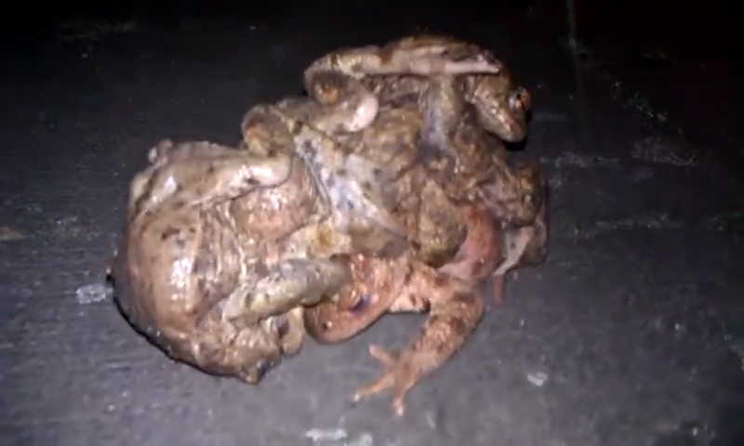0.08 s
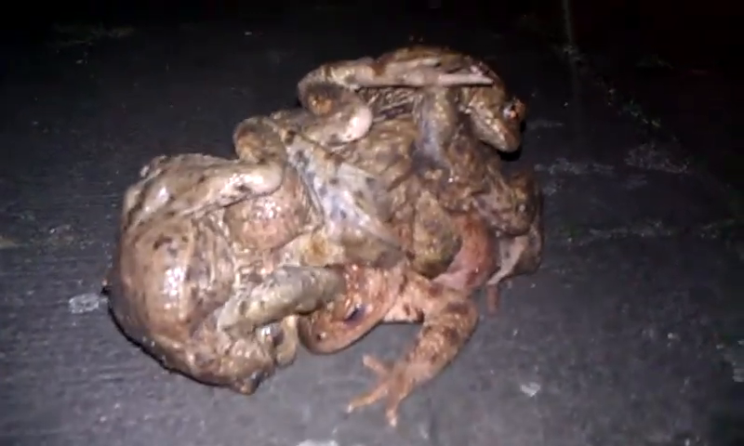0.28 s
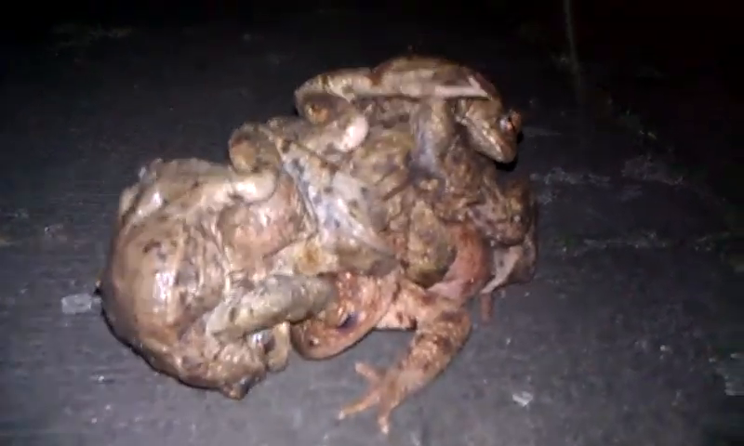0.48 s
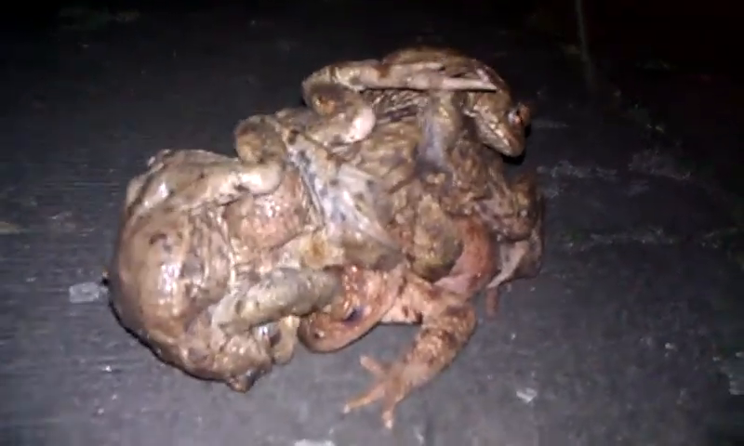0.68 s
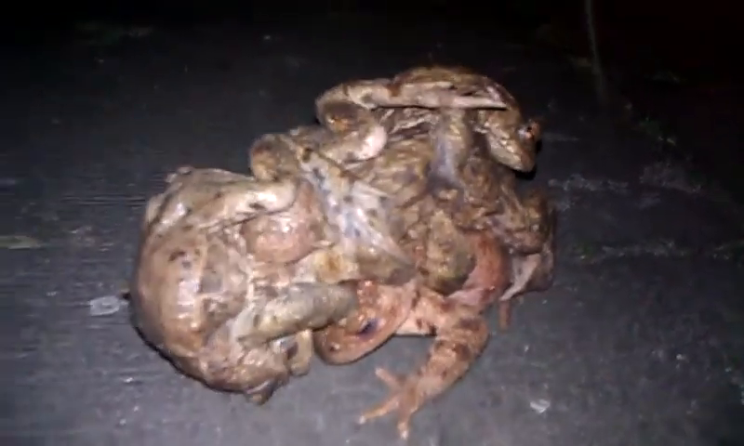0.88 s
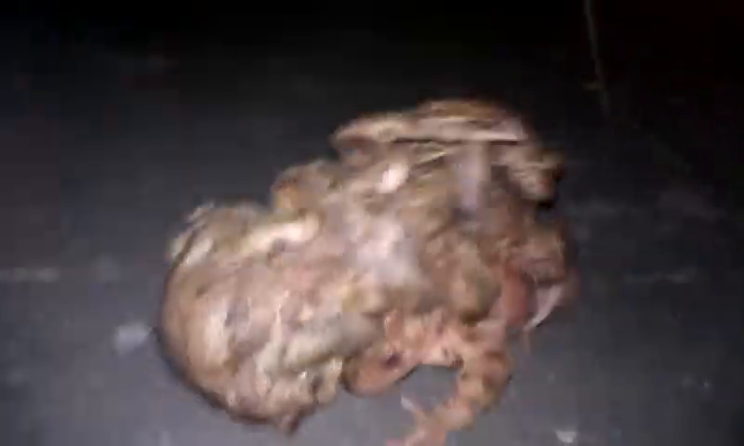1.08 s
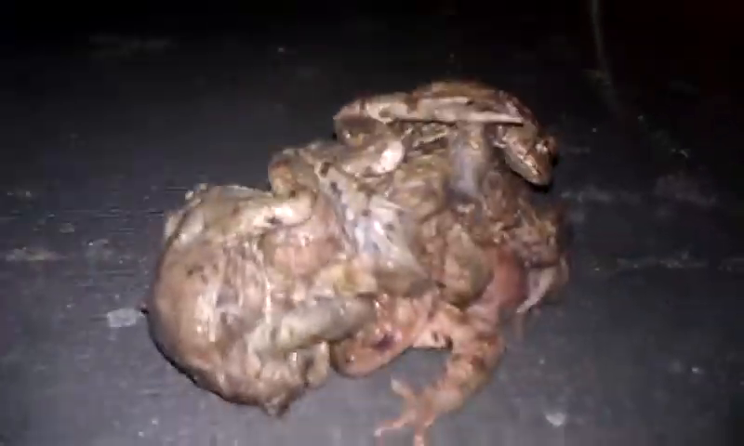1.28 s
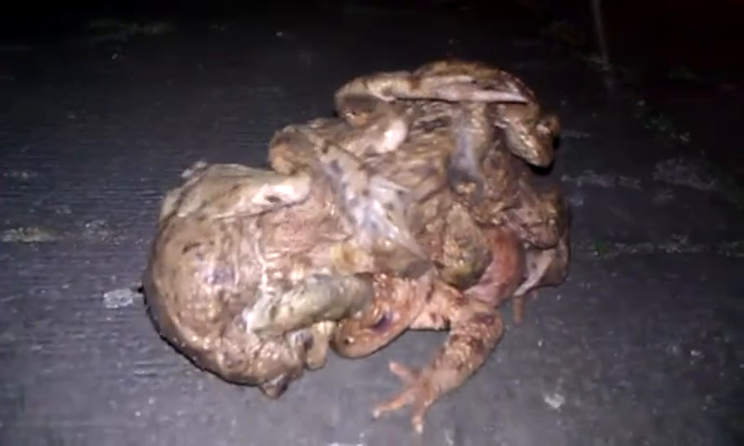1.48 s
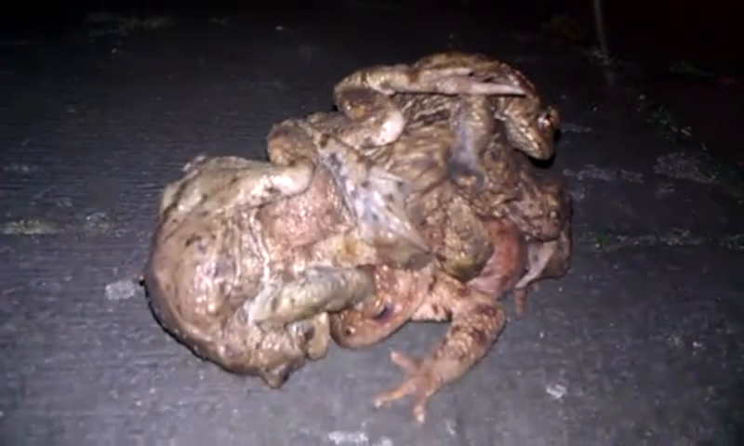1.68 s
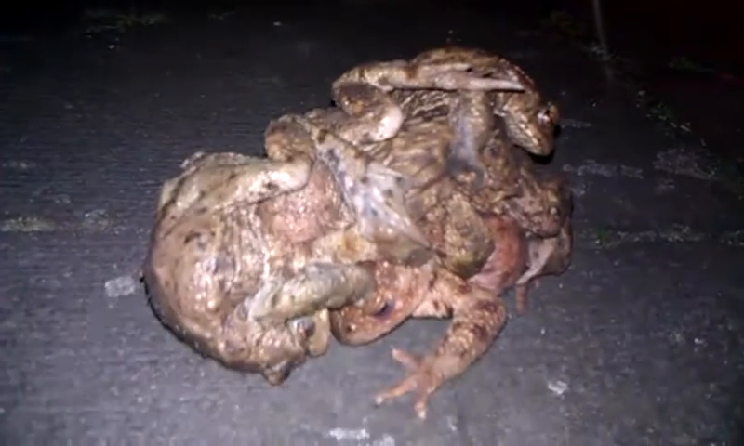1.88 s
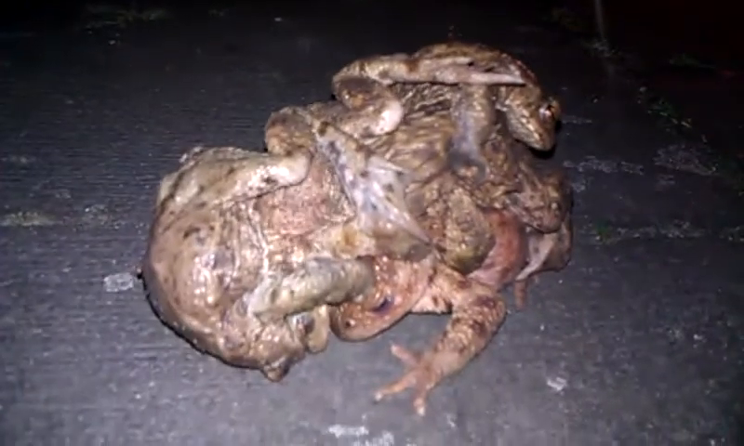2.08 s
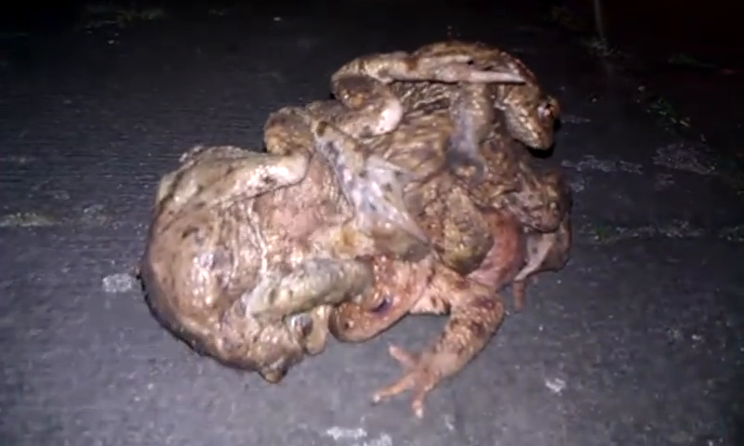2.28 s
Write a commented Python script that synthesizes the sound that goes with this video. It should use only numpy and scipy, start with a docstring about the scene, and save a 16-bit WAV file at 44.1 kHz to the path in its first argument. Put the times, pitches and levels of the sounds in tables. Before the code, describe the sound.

Toads chirp three times, close and dry, on a quiet night outdoors. First, at 0.2 s, clicks and a bright sharp rustle, probably a sleeve, trail off by 0.65 s. Soft scuffs lead to a short chirp at 0.92 s, with sharp clicks near 0.98. A longer stuttering chirp comes at 1.27, another at 1.99, each ending in a brief whistle-like note. Faint peeps, air and low hum lie behind.

```python
"""A sharp rustle, probably a sleeve, is heard first, with clicks at its onset; it trails off.
Then toads in a mating knot give three release chirps close to the microphone, on a quiet night.
Each chirp is a few short throat pulses that run together into a held, nearly pure note.
Small scuffs and clicks surround the first chirp; faint peeps, air and a low hum lie far behind.
Voices are summed overtones with breath noise; rustle, scuffs, clicks and air are coloured noise."""
import sys
import numpy as np
from scipy import signal
from scipy.fft import rfft, irfft
from scipy.io import wavfile
from scipy.ndimage import uniform_filter1d

SR = 44100
rng = np.random.default_rng(int(sys.argv[2]) if len(sys.argv) > 2 else 0)


def int16_out(signal):
    """Quantize to a 16-bit WAV file."""
    q = np.round(np.clip(np.atleast_2d(signal).T, -1, 1) * 32767)
    wavfile.write(sys.argv[1], SR, q.astype(np.int16))


N = 101430

# Every colour below shapes noise by frequency. Each row: frequency in Hz, relative level in dB.
# The night air, and the slow level of the far hum. Each hum row: time in seconds, level in dB.
NIGHT_COLOUR = [(20, -23), (40, -13), (60, -8), (90, -9), (135, -7), (170, -12.5), (300, -14.5),
                (520, -15.5), (870, -15), (1200, -18), (3000, -27.5), (5500, -25.5), (9000, -30),
                (15500, -33.5)]
HUM_LEVEL = [(0, -68), (.7, -68), (.85, -66.5), (1.4, -63), (1.5, -57.5), (1.65, -59.5), (1.85, -65),
             (1.92, -69), (2.3, -74)]
NIGHT_DB, HUM_HZ = -57, 55

# Faint far peeps. Each row: middle in seconds, half length in seconds, level in dB, mean pitch in Hz.
PEEPS = [(0.787, 0.19, -63.5, 1500), (1.862, 0.0036, -51.5, 1310)]

# Soft scuffs. Each row: peak time in seconds, level in dB, rise in seconds, fall in seconds.
SCUFFS = [(0.722, -54, 0.0032, .004), (0.809, -45.5, 0.0058, 0.017), (0.897, -38.5, 0.011, 0.011),
          (.915, -46, 0.0068, 0.027), (.975, -38.5, 0.0091, .014)]
SCUFF_COLOUR = [(400, -12), (2000, -16), (3300, -4), (4800, -1.5), (6500, 2), (8500, -9), (10500, -12),
                (12000, -36), (15500, -25)]

# Dry clicks. Each row: start in seconds, level in dB, decay in seconds, then the crack and the thud,
# both in dB against the click.
CLICKS = [(0.2135, -36.5, 0.0012, -8, -26), (0.2307, -23.5, 0.0018, -26, -28),
          (0.969, -21.5, 0.001, -0.5, -26), (0.9886, -32, 0.003, -4, -34), (0.9908, -12, 0.00098, -20, -11)]
# Colours of the click's bright ring and of its broad crack.
CLICK_COLOUR = [(300, -25.5), (1500, -17.5), (3000, -29.5), (4100, -10), (4700, -1), (5400, 3), (6600, 0.5),
                (8500, -10.5), (11000, -19), (15500, -53)]
CRACK_COLOUR = [(120, -43), (600, -26), (1600, -19), (3000, 7.5), (5000, -3), (9500, 2), (15500, -11)]
THUD_HZ, THUD_S = 500, 0.002
CLICK_TAIL_DB, CLICK_TAIL_S = -28, 0.004  # tail against the click, and its decay

# Rustle: the quick swish, the longer slide beneath and beyond it, and the slide's treble.
# Each row: time in seconds, level in dB.
SWISH_LEVEL = [(.222, -57), (.230, -36), (.236, -24.5), (.243, -17.5), (.250, -22.5), (.259, -27),
               (.266, -36), (.295, -37.5), (.33, -56)]
SLIDE_LEVEL = [(.21, -70), (.216, -45), (.226, -49), (.233, -35), (.285, -39.5), (.335, -44), (.36, -42),
               (.39, -44), (.46, -40), (.50, -43), (.55, -47), (.595, -49), (.635, -66), (.68, -87)]
SHEEN_LEVEL = [(.34, -66), (.41, -63), (.48, -42.5), (.53, -50), (.60, -83)]
# Their colours, in the same order.
SWISH_COLOUR = [(300, -41), (1600, -42), (2700, -36), (3050, -12.5), (3450, -9.5), (4200, -28), (5400, 1.5),
                (8200, 1), (9400, -7), (10600, -8.5), (11500, -10), (12700, -5), (15500, -5)]
SLIDE_COLOUR = [(400, -31.5), (1800, -28), (3500, -17), (4600, -9.5), (5600, -1), (6900, -10),
                (8200, -11.5), (10000, -17), (15500, -20.5)]
SHEEN_COLOUR = [(3000, -50), (7000, -8), (9000, 3), (10000, -4), (15500, -3.5)]
RUSTLE_GRAIN_DB = 2.2

# Opening pulses of the chirps. Each row: start in seconds, driven length in seconds, level in dB,
# pitch in Hz before scoop and jitter, brightness in dB against the level.
PULSES = [(0.9217, 0.002, -22, 1205, -5), (0.9303, 0.0033, -22, 1131, -2),
          (1.274, 0.00097, -21.5, 1274, -1), (1.2818, 0.0024, -26.5, 1232, 3),
          (1.2894, 0.0022, -19, 1221, -4), (1.2967, 0.0028, -20, 1182, -1), (1.3048, 0.0033, -20, 1171, -1),
          (1.3116, 0.004, -23, 1131, -0.5), (1.9890, 0.0022, -23.5, 1287, 2),
          (1.9952, 0.0018, -19.5, 1214, 3), (2.0030, 0.0031, -20.5, 1143, 1)]
# Held notes that end the chirps. Each row: start in seconds, length in seconds, starting level in dB,
# fade in dB per second, pitch in Hz before scoop and jitter, sag in Hz per second, overshoot in Hz,
# attack in seconds.
NOTES = [(0.9346, .0445, -22.5, 110, 1083, 29, 1.2, 0.0084),
         (1.3151, .0375, -20.8, 256, 1062, 480, 38.6, 0.0023),
         (2.0100, 0.035, -19, 209, 1092, 260, 30, 0.00095)]
# Overtones of the throat. Each row: frequency in Hz, level in dB against the fundamental,
# before the edge settings below.
THROAT = [(2150, -24), (3250, -26), (4350, -27.5), (5400, -33), (6500, -32.5), (8200, -40), (9700, -32.5),
          (10800, -26), (11900, -33), (13000, -35), (14000, -27.5), (15100, -18.5)]
RASP_COLOUR = [(500, -18), (900, -2), (1500, 8), (2900, -0.5), (3600, -1), (5800, 5), (8000, -9.5),
               (11000, -5), (13000, 2), (15000, 3.5)]
PULSE_ATTACK_S, PULSE_RING_S, NOTE_RELEASE_S = 0.0012, 0.00106, 0.0015
SCOOP, SCOOP_S = 0.34, 0.00061  # each opening starts sharp by this share, then settles
PULSE_JITTER, NOTE_JITTER = 0.018, 0.0068  # random pitch wobble, as a share of the pitch
SETTLE_S, RASP_S = 0.0081, 0.029  # the note's overshoot and rasp die away
PULSE_EDGE_DB, NOTE_EDGE_DB, RASP_DB = 4.5, 1.5, -27
FULL_DB, EDGE_GROWTH = -21, 0.29  # a note's edge and rasp gain this many extra dB per dB above FULL_DB
EDGE_HOLD_S, EDGE_FADE_S, EDGE_HZ = 0.014, 0.011, 7300  # the top overtones die as the pressure drops
SNAP_DB, SNAP_DELAY_S, SNAP_S = -19, 0.00097, 0.00038  # each pulse starts with a brief spit of air
LEAK_DB, LEAK_S = -24.5, 0.0025  # air seeps through around each pulse
SHIMMER_DB = 2  # each overtone flutters on its own

# Colour of the trace of echo from the open ground, before its decay is applied.
ECHO_COLOUR = [(1000, 9.5), (6000, 14), (12000, -64)]
ECHO_DB, ECHO_S = -36, 0.06
TOP_HZ = 15850


def undb(db):
    """Decibels to gain."""
    return 10 ** (np.asarray(db) / 20)


def unit(x):
    """Scale to rms 1."""
    return x / np.sqrt(np.mean(x ** 2) + 1e-20)


def curve(t, points):
    """Gain along (s, dB) points, practically silent outside."""
    times, levels = np.array(points).T
    return undb(np.interp(t, times, levels, left=-150, right=-150))


def colour(x, points):
    """Causal, minimum-phase filter through (Hz, dB) points, built by folding the cepstrum."""
    hz, db = np.array(points, float).T
    f = np.maximum(np.fft.rfftfreq(N, 1 / SR), 1)
    log_gain = np.log(undb(np.interp(np.log(f), np.log(hz), db)))
    cepstrum = irfft(log_gain, N)
    cepstrum[1:N // 2] *= 2
    cepstrum[N // 2 + 1:] = 0
    return irfft(rfft(x) * np.exp(rfft(cepstrum)), N)


def walk(rate):
    """Smooth random wander with spread 1; a higher rate in Hz wanders faster."""
    width = max(int(SR / rate), 2)
    once = uniform_filter1d(rng.standard_normal(N), width)
    return unit(uniform_filter1d(once, width))


def friction(points, grain_db, grain_rate):
    """Dense tiny slips that bunch into grains and ring the surface."""
    slips = rng.standard_normal(N) * undb(grain_db * walk(grain_rate))
    return unit(colour(slips, points))


def night(t):
    """Faint, nearly even air and a far hum that wavers in pitch and level."""
    air = undb(NIGHT_DB + 0.5 * walk(6.3)) * unit(colour(rng.standard_normal(N), NIGHT_COLOUR))
    hum_pitch = HUM_HZ * (1 + 0.043 * walk(14.8))
    hum = np.sin(2 * np.pi * np.cumsum(hum_pitch) / SR)
    return air + curve(t, HUM_LEVEL) * unit(hum * undb(2 * walk(25)))


def peeps(t):
    """Thin tones from far off, swelling and fading while their pitch wavers."""
    clock = np.cumsum(1 + 0.0146 * walk(82)) / SR  # seconds, running slightly unevenly
    out = np.zeros(N)
    for middle, half, db, hz in PEEPS:
        swell = np.exp(-((t - middle) / half) ** 2)
        out += undb(db) * swell * np.sin(2 * np.pi * hz * clock)
    return out


def scuffs(t):
    """Brief gritty rubs: grainy friction that rises and falls around each peak."""
    env = np.zeros(N)
    for peak, db, rise, fall in SCUFFS:
        env += undb(db) * np.exp(-np.maximum((peak - t) / rise, (t - peak) / fall))
    return env * friction(SCUFF_COLOUR, grain_db=1.5, grain_rate=410)


def clicks(t):
    """Sharp snaps: a broad crack, a bright ring with a short tail, and a small thud."""
    snap, crack, out = np.zeros((3, N))
    for start, db, decay, crack_db, thud_db in CLICKS:
        age = np.maximum(t - start, 0)
        begun = t >= start
        tail = undb(CLICK_TAIL_DB) * np.exp(-age / CLICK_TAIL_S)
        snap += undb(db) * begun * (np.exp(-age / decay) + tail)
        crack += undb(db + crack_db) * begun * np.exp(-2 * age / decay)
        thud_env = (1 - np.exp(-age / decay)) * np.exp(-age / THUD_S)
        out += undb(db + thud_db) * thud_env * np.sin(2 * np.pi * THUD_HZ * age)
    for env, points in ((snap, CLICK_COLOUR), (crack, CRACK_COLOUR)):
        crackle = np.sign(rng.standard_normal(N))
        out += colour(env * crackle, points) / np.std(colour(crackle, points))
    return out


def rustle(t):
    """Friction: a bright swish over a longer slide that brightens in its second half."""
    swish = curve(t, SWISH_LEVEL) * friction(SWISH_COLOUR, RUSTLE_GRAIN_DB, grain_rate=2400)
    slide = curve(t, SLIDE_LEVEL) * friction(SLIDE_COLOUR, RUSTLE_GRAIN_DB, grain_rate=1300)
    sheen = curve(t, SHEEN_LEVEL) * friction(SHEEN_COLOUR, RUSTLE_GRAIN_DB, grain_rate=680)
    return swish + slide + sheen


def opening(t, start, length, attack, release):
    """One opening of the larynx: its age, its envelope and its sharp start in pitch."""
    age = np.maximum(t - start, 0)
    rise = np.sin(np.pi / 2 * np.minimum(age / attack, 1)) ** 2
    fall = np.exp(-np.maximum(age - length, 0) / release)
    scoop = 1 + SCOOP * np.exp(-age / SCOOP_S)
    return age, rise * fall, scoop


def toads(t):
    """One reed-like larynx: spitting pulses run into a held note that sags and loses its top overtones."""
    loud, edge, rasp, slack, pitch = np.zeros((5, N))
    wobble = walk(580)
    for start, length, db, hz, bright_db in PULSES:
        age, env, scoop = opening(t, start, length, PULSE_ATTACK_S, PULSE_RING_S)
        pulse = undb(db) * env
        bright = undb(db + bright_db)
        loud += pulse
        edge += bright * undb(PULSE_EDGE_DB) * env ** 2
        spit = undb(SNAP_DB) * np.exp(-((t - start - SNAP_DELAY_S) / SNAP_S) ** 2)
        leak = undb(LEAK_DB) * np.exp(-np.abs(t - start) / LEAK_S)
        rasp += bright * (undb(RASP_DB) * env ** 2 + spit + leak)
        pitch += pulse * hz * scoop * (1 + PULSE_JITTER * wobble)
    for start, length, db, fade, hz, sag, overshoot, attack in NOTES:
        age, env, scoop = opening(t, start, length, attack, NOTE_RELEASE_S)
        note = undb(db - fade * age) * env
        bright = note * undb(EDGE_GROWTH * (db - FULL_DB))  # the edge grows with effort
        loud += note
        edge += bright * env * undb(NOTE_EDGE_DB)
        rasp += bright * undb(RASP_DB) * np.exp(-age / RASP_S)
        slack += note * np.maximum(age - EDGE_HOLD_S, 0) / EDGE_FADE_S
        glide = hz - sag * age + overshoot * np.exp(-age / SETTLE_S)
        pitch += note * glide * scoop * (1 + NOTE_JITTER * wobble)
    # where openings overlap, the louder one steers the single larynx
    pitch = pitch / (loud + 1e-12)
    slack = slack / (loud + 1e-12)
    phase = 2 * np.pi * np.cumsum(pitch) / SR
    breath = rasp * unit(colour(rng.standard_normal(N), RASP_COLOUR))
    out = loud * np.cos(phase) + breath
    throat_hz, throat_db = np.array(THROAT).T
    for k in range(2, 15):
        throat = undb(np.interp(k * pitch, throat_hz, throat_db) + SHIMMER_DB * walk(330))
        dulling = np.exp(-(slack * k * pitch / EDGE_HZ) ** 2 / 2)
        out += edge * throat * dulling * np.cos(k * phase)
    return out


def scene():
    """Everything is central; the open ground gives only a trace of echo."""
    t = np.arange(N) / SR
    sources = peeps(t) + scuffs(t) + clicks(t) + rustle(t) + toads(t)
    tail = colour(rng.standard_normal(N), ECHO_COLOUR) * np.exp(-t / ECHO_S)
    echo = signal.fftconvolve(sources, unit(tail) / np.sqrt(N))[:N]  # tail scaled to energy 1
    both = sources + undb(ECHO_DB) * echo + night(t)
    return np.tile(both, (2, 1))


def record(dry):
    """The recorder cuts the top with a steep elliptic low-pass."""
    top_cut = signal.ellip(12, 0.2, 80, TOP_HZ, fs=SR, output="sos")
    return signal.sosfilt(top_cut, dry)


dry = scene()
out = record(dry)
int16_out(out)
```